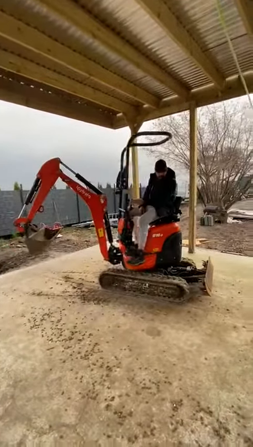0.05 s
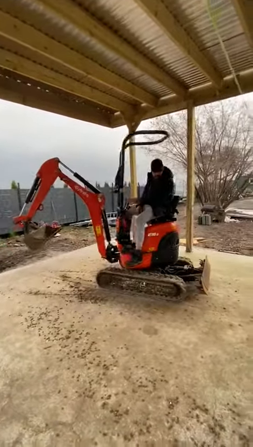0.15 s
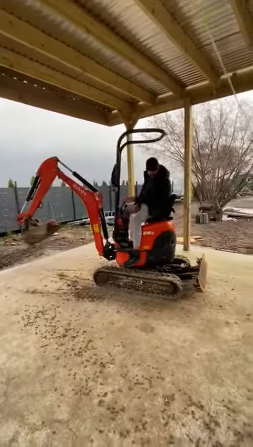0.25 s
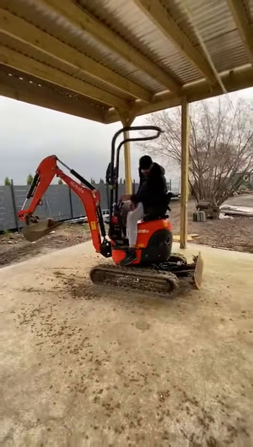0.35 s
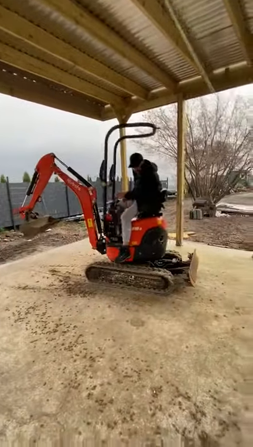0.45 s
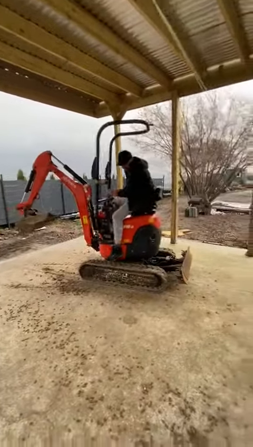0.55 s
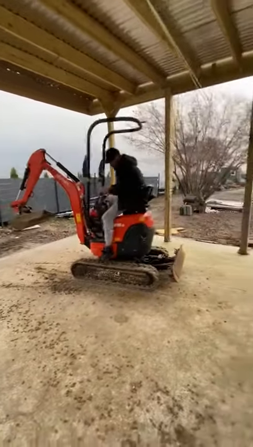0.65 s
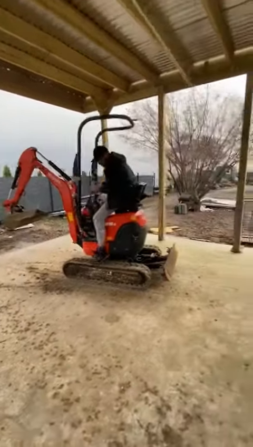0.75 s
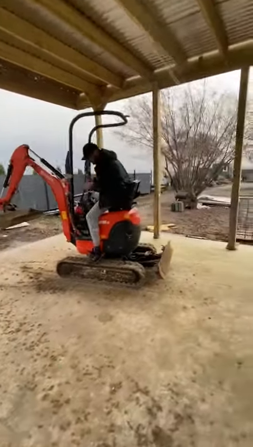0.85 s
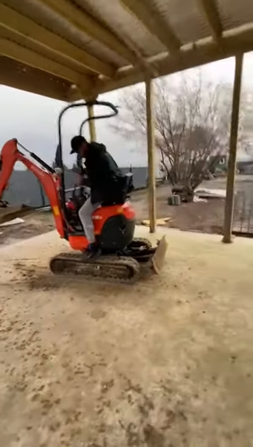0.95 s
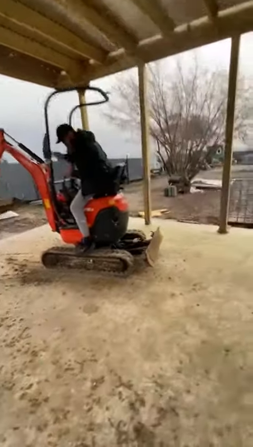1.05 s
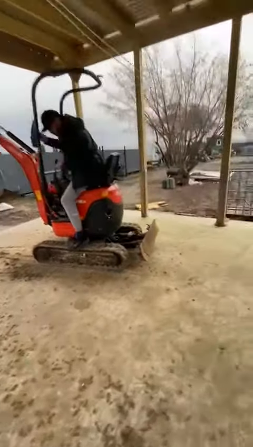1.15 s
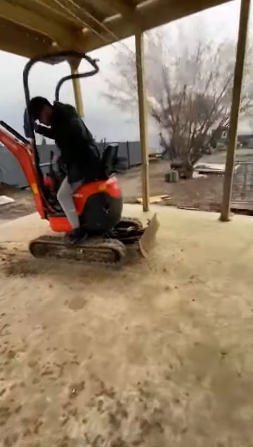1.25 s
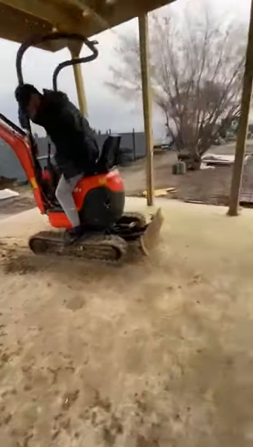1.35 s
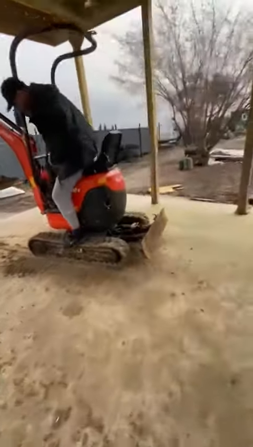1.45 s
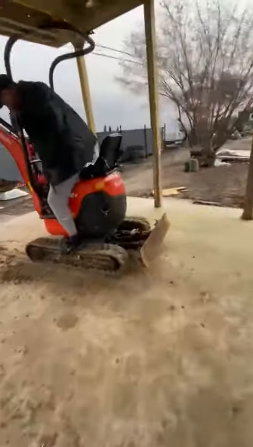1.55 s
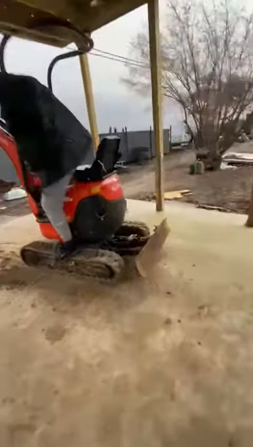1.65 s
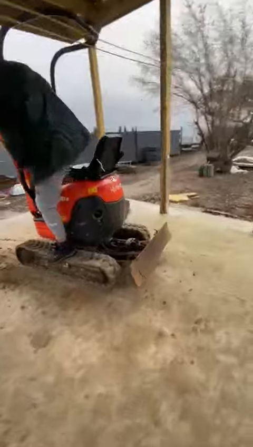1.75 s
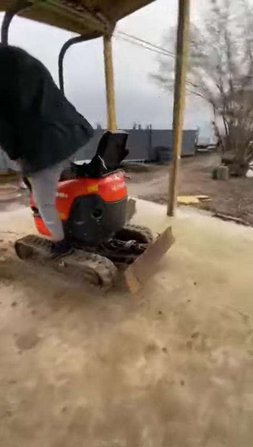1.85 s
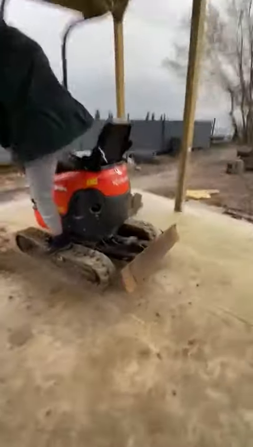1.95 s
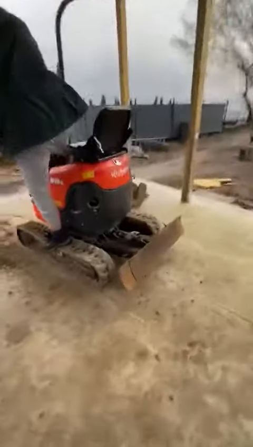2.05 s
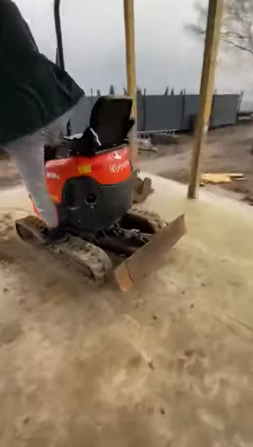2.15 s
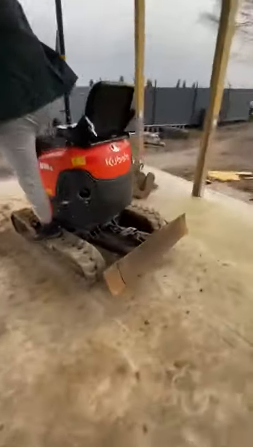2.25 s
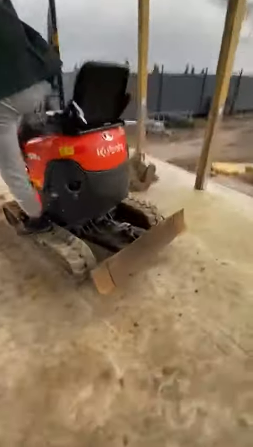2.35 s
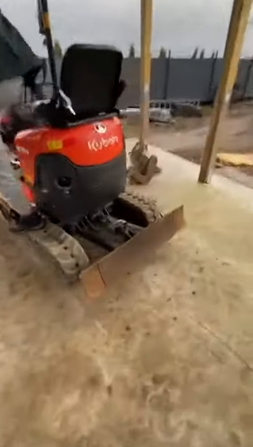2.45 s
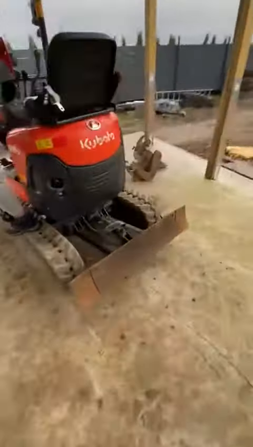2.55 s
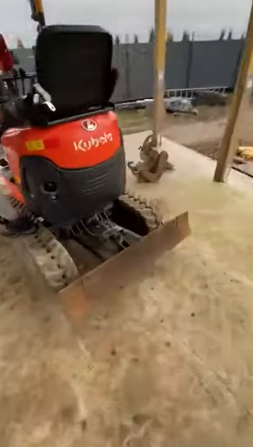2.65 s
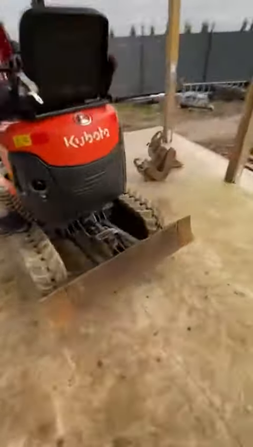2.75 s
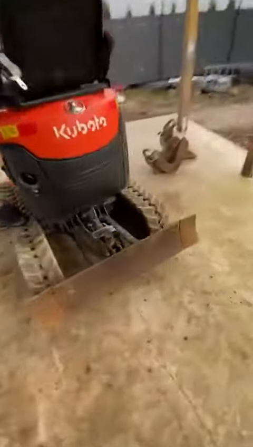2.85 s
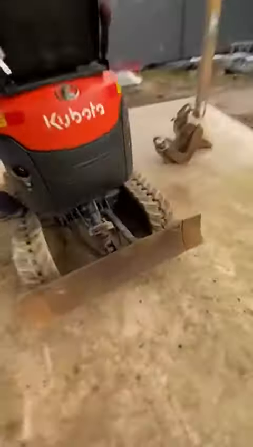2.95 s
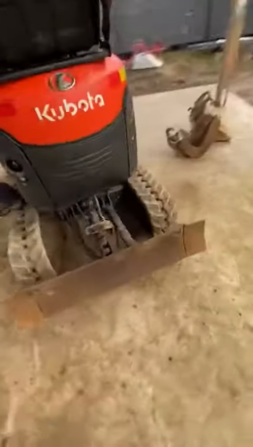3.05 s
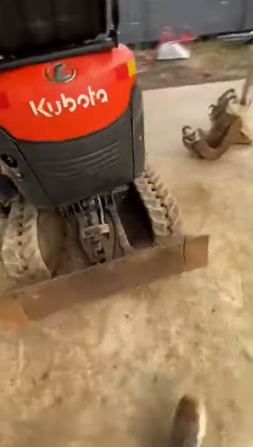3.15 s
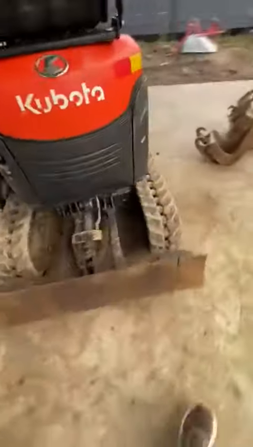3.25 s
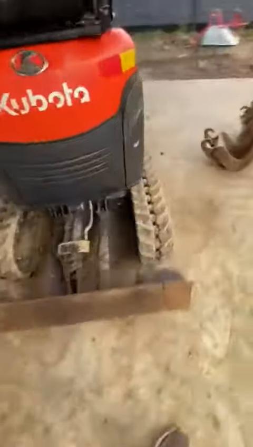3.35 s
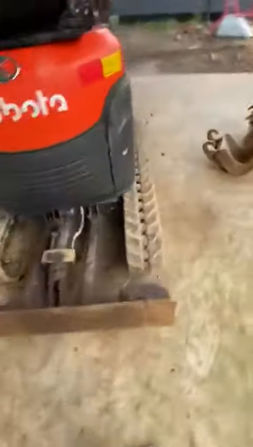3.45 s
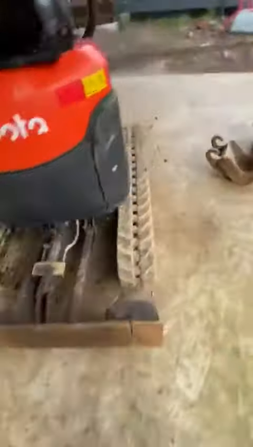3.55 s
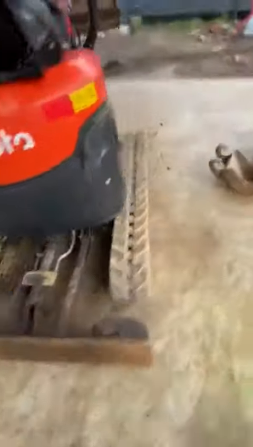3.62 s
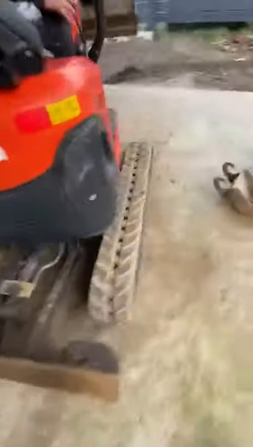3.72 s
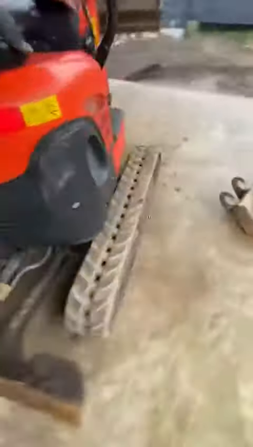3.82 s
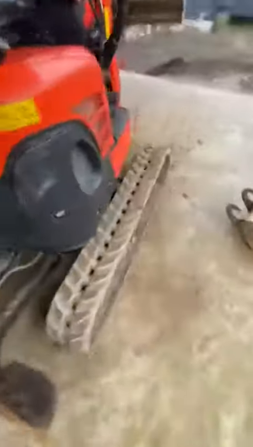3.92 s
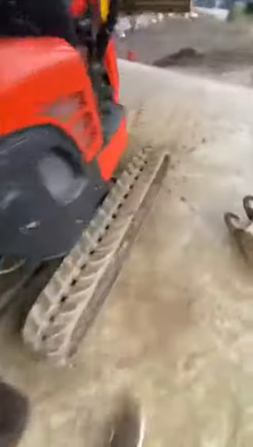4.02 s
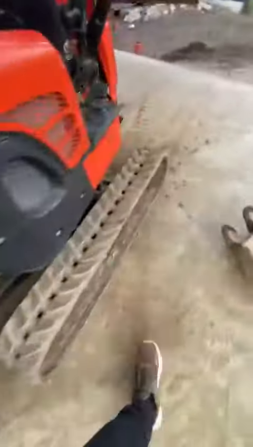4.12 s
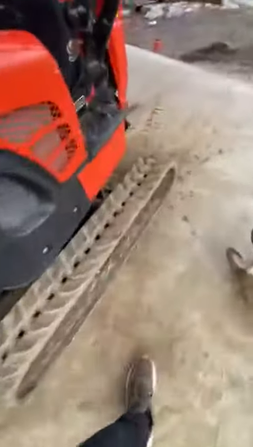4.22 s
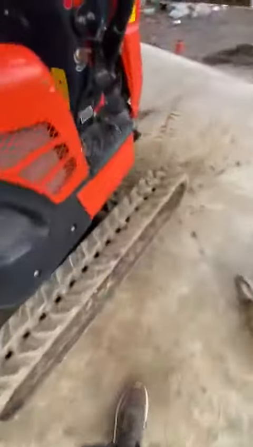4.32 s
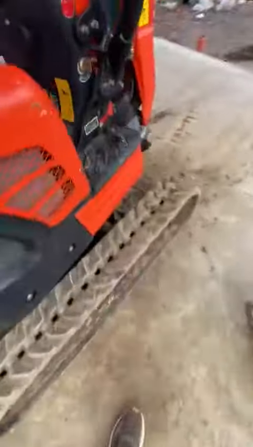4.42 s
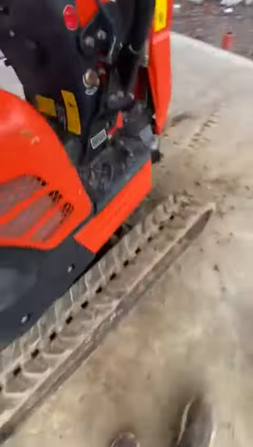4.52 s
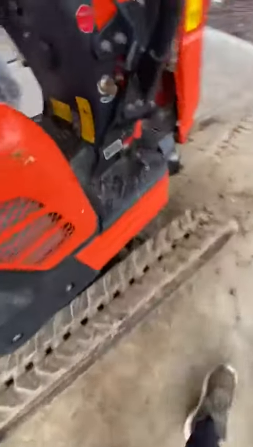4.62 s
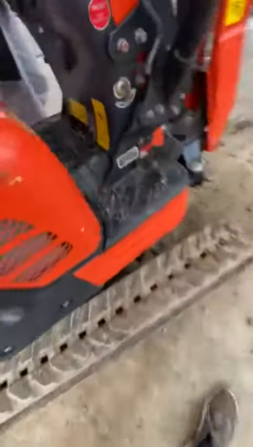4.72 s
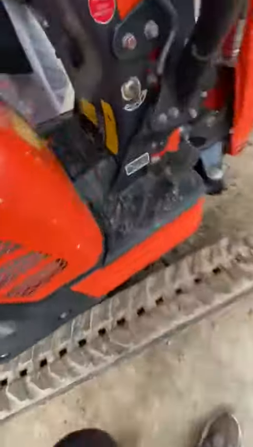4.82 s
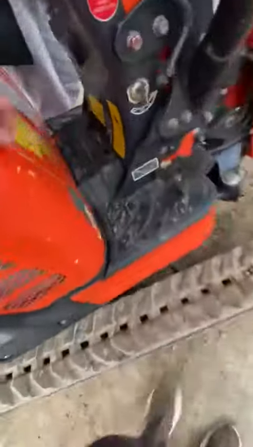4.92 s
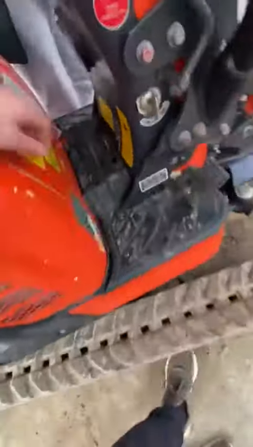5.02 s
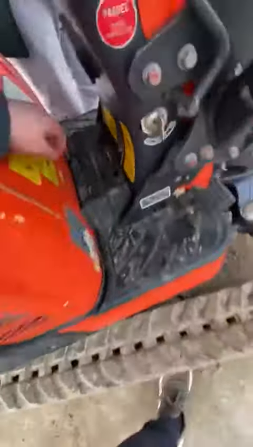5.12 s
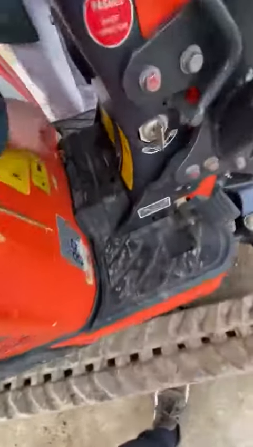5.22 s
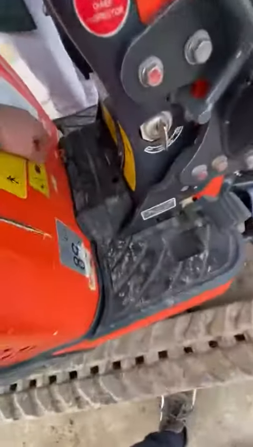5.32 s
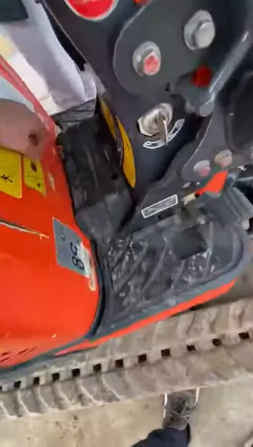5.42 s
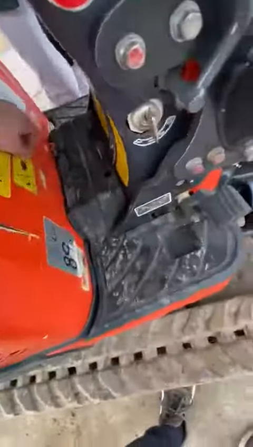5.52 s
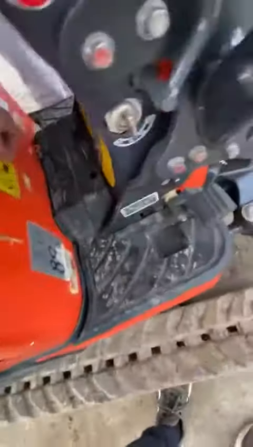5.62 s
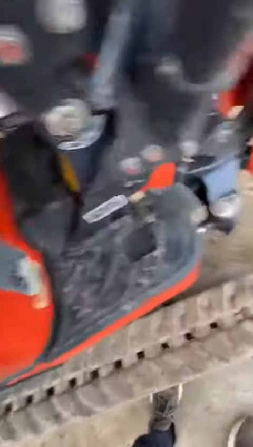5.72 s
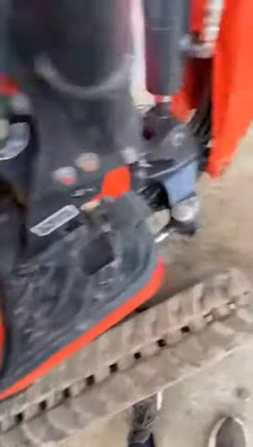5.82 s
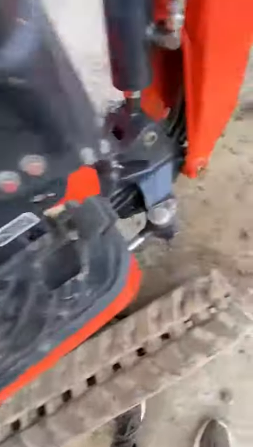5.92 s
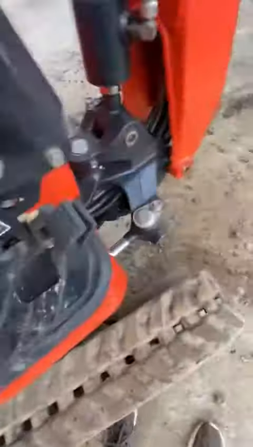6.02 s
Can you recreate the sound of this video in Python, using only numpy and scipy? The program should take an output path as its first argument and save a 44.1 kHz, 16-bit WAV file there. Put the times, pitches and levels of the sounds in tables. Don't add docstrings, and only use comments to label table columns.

```python
import sys
import numpy as np
from scipy import signal
from scipy.fft import rfft, irfft, next_fast_len
from scipy.io import wavfile
from scipy.ndimage import uniform_filter1d, map_coordinates

SR = 44100
rng = np.random.default_rng(int(sys.argv[2]) if len(sys.argv) > 2 else 0)


def pcm_store(signal):
    levels = np.round(np.clip(np.atleast_2d(signal), -1, 1) * 32767)
    wavfile.write(sys.argv[1], SR, levels.astype(np.int16).T)


def rack_gain(trim_db):
    fader = np.asarray(trim_db, float)
    return 10 ** (fader / 20)


N = 267819
GOVERNED_HZ = 53.4

# start_s, stop_s, change_hz [firings a second]
LOADS = [
    (-.1, .87, -.7),
    (3.22, 3.345, -2.5),
    (3.5, 3.98, -2.4),
    (4.27, 4.5, -2.5),
    (5.29, 6.2, 5),
]
# time_s, nearness_db, flank [share 0-1 round to the side],
# aim_db [in line with the pipe], path_m [pipe path minus intake path]
WALK = [(0, 0.5, 0.05, 1, 1.22), (.8, 2, 0.1, 3.5, 1.13), (1, 1.5, 0, 7, 1.76), (1.5, 3, 0, 8, 1.64),
        (2, 4.5, 0.01, 9, 1.53), (2.5, 6, 0.14, 9, 1.47), (2.9, 8, 0.02, 10, 1.39),
        (3.2, 8.5, 0.23, 9, 1.44), (3.4, 8.5, 1, 8.5, 1.53), (3.6, 7.5, 0.6, 7.5, 1.52),
        (3.8, 10, 0.7, 4, 2.3), (4, 9.5, 0.84, 6, 2.6), (4.2, 13, 1, 5, 2.6), (4.8, 12.5, 0.77, 2, 2.07),
        (5.15, 10, 1.1, 10, 2.41), (5.4, 11.5, 1, 4.5, 1.46), (5.63, 10, 0.71, 9, 2.23),
        (6.07, 9, 0.66, 15, 3.53)]


def unit(x):
    return x / np.sqrt(np.mean(x ** 2) + 1e-20)


def along(points, hz):
    f, v = np.transpose(points)
    return np.interp(np.log(hz + 1), np.log(f + 1), v, left=v[0], right=v[-1])


def curves(rows):
    s, *columns = np.transpose(rows)
    return [np.interp(np.arange(N) / SR, s, column) for column in columns]


def wobble(rate, size=N):
    knots = rng.standard_normal(int(size * rate / SR) + 4)
    return map_coordinates(knots, [np.arange(size) * rate / SR])


def span(start, stop, ramp):
    t = np.arange(N) / SR
    return (np.tanh((t - start) / ramp) - np.tanh((t - stop) / ramp)) / 2


def filtered(x, response):
    m = next_fast_len(N + SR // 2)
    return irfft(rfft(x, m) * response(np.fft.rfftfreq(m, 1 / SR)), m)[..., :N]


def rush(spectrum, gate, patchy_db, size=6):
    z = signal.stft(rng.standard_normal((2, N)), nperseg=512)[2]
    patches = uniform_filter1d(rng.standard_normal(z.shape[1:]), size=size, axis=0)
    patches = uniform_filter1d(patches, size=12, axis=1)
    pair = signal.istft(z * rack_gain(patchy_db * unit(patches)), nperseg=512)[1][:, :N]
    return unit(filtered(pair * gate, lambda hz: rack_gain(along(spectrum, hz))))


def bursts(turns, depth, shaft, scatter_db):
    count = (turns + .25).astype(int)
    size = rack_gain(scatter_db * rng.standard_normal(count[-1] + 1)[count])
    firing = (.5 + .5 * np.sin(2 * np.pi * turns)) ** 2
    return 1 + depth * size * firing + shaft * np.sin(2 * np.pi * turns * 2 / 3)


def speed():
    held = GOVERNED_HZ + .15 * wobble(3)
    held = held + sum(change * span(start, stop, .035) for start, stop, change in LOADS)
    after = np.arange(N) / SR - 5.6
    droop = 1 - .05 * np.clip(1 + after / .2, 0, 1)
    coast_to, coast_s = .47, .26
    return held * droop * (coast_to + (1 - coast_to) * np.exp(-np.maximum(after, 0) / coast_s))


def exhaust(turns, rate):
    # multiple, level_db,
    # near [dB per dB of nearness], aim [dB per dB of aim], power [of speed]
    strong_tones = [(2, -27, .01, 0.95, 4.7), (4, -33, 0.81, 0.21, 0.21), (5, -31, 0.46, 0.35, 4.2)]
    # multiple, level_db, near [dB per dB of nearness]
    weak_tones = [(3, -34.5, -0.096), (6, -33, -0.25), (7, -38, 0.29), (8, -39.5, 0.22), (9, -53.5, -0.078),
                  (11, -42.5, 0.1), (13, -48.5, 0.084)]
    near_db, flank, aim_db, path_m = curves(WALK)
    pace_db = 20 * np.log10(rate / GOVERNED_HZ)
    far_shape, flank_shape = .63, .3
    shape = far_shape + (flank_shape - far_shape) * np.clip(flank, 0, 1)
    intake = 0.98

    def tone(k, db, sway_db):
        level = rack_gain(db + 2.0 + sway_db * wobble(14))
        offset = .04 * k if k > 1 else -.3
        return level * np.cos(2 * np.pi * (k * turns + shape + offset + 0.078 * wobble(12)))

    def comb(k):
        delay_turns = k * rate * path_m / 343
        return np.abs(1 - intake * np.exp(2j * np.pi * delay_turns)) / (1 + intake)

    first_db = -38.5 + 2.255 * np.minimum(near_db, 11) - 0.31 * aim_db + 1.6 * pace_db
    out = tone(1, first_db, sway_db=0.9)
    for k, db, near, aim, power in strong_tones:
        out += comb(k) * tone(k, db + near * near_db + aim * aim_db + power * pace_db, sway_db=0.8)
    for k, db, near in weak_tones:
        out += tone(k, db - 2.5 + near * near_db + 10.3 * flank + 1.8 * pace_db, sway_db=2.5)
    return out


def casing(turns, rate):
    # level_db, near [dB per dB of nearness],
    # flank_db [change at the side], power [of speed]
    layers = [(-30.5, 0.29, 8, 2), (-34.5, 1.016, 0.74, 1.4), (-40.5, 1.177, 0.75, 1.37),
              (-44.5, 0.91, -2, 2.4)]
    # pitch_hz, density_db [per Hz]
    throb_spectrum = [(30, -7), (60, -5.5), (150, 8.5), (250, 5.5), (400, 5.5), (600, -18), (1000, -73)]
    block_spectrum = [(250, -58), (500, 2.5), (750, -1), (1000, -0.5), (1400, -6.5), (2100, -6.5),
                      (2700, -6.5), (4000, -50)]
    clatter_spectrum = [(1800, -48), (2800, -1), (3700, .5), (4700, 2.5), (5500, -4), (6400, -8),
                        (7500, -10), (9000, -72.5)]
    fan_spectrum = [(5500, -25), (6800, -2), (8300, -1), (9300, -5), (11000, -7), (11600, -13),
                    (12000, -40)]
    near_db, flank, *_ = curves(WALK)
    pace_db = 20 * np.log10(rate / GOVERNED_HZ)
    throb_db, block_db, clatter_db, fan_db = (
        db + near * near_db + flank_db * flank + power * pace_db for db, near, flank_db, power in layers)
    fan_db = fan_db + np.interp(np.arange(N) / SR, (3.77, 4.3, 6.9), (0, -6.5, -11))
    shake = wobble(14)

    gate = bursts(turns, depth=0.65, shaft=0.031, scatter_db=-2.0)
    throb = rack_gain(throb_db - 2.5 + 1.2 * wobble(5.5)) * rush(throb_spectrum, gate, patchy_db=-1.5)
    gate = bursts(turns, depth=.35, shaft=.05, scatter_db=4)
    block = rack_gain(block_db + .1 + .5 * shake) * rush(block_spectrum, gate, patchy_db=2, size=2)
    gate = bursts(turns, depth=.35, shaft=.07, scatter_db=4)
    clatter = rack_gain(clatter_db + .1 + .6 * shake) * rush(clatter_spectrum, gate, patchy_db=1.2, size=3)
    gate = bursts(turns, depth=.4, shaft=.1, scatter_db=4.5)
    fan = rack_gain(fan_db + .1 + .6 * shake) * rush(fan_spectrum, gate, patchy_db=1.5)
    return throb + block + clatter + fan


def hydraulics(turns, rate):
    pump_db = -41 + 10 * span(4.35, 5.28, .1)
    pump_db = pump_db + 4 * span(*LOADS[0][:2], .05) + 40 * np.log10(rate / GOVERNED_HZ)
    pump = rack_gain(pump_db + 2.5 * wobble(10)) * np.sin(2 * np.pi * 16 * turns + .35 * wobble(25))

    valve_db = -42 - 20 * (1 - span(3.85, 4.32, .1))
    valve = rack_gain(valve_db + 2.5 * wobble(12)) * np.sin(2 * np.pi * 41 * turns + .8 * wobble(40))

    def panel(hz):
        low = 0.06 / (1 + ((hz - 800) / 60) ** 2)
        middle = 1 / (1 + ((hz - 1070) / 25) ** 2)
        high = .5 / (1 + ((hz - 1420) / 30) ** 2)
        return low + middle + high

    panel_db = -30.5 + np.interp(np.arange(N) / SR, (3, 4.9), (-26, 0))
    shaking = rng.standard_normal(N) * bursts(turns, depth=1.3, shaft=.3, scatter_db=-9.5)
    return pump + valve + rack_gain(panel_db) * unit(filtered(shaking, panel))


def wind():
    # time_s, level_db, half_length_s, pitch_hz
    puffs_and_thuds = [(0.666, -29, 0.068, 66.4), (1.087, -39, .04, 60), (1.341, -22, .05, 64.6),
                       (1.556, -24, 0.053, 65.3), (1.78, -18, 0.05, 69), (2.385, -17.5, 0.092, 80.5),
                       (2.463, -18, 0.053, 84), (2.62, -27, 0.06, 90), (2.747, -28, 0.05, 80),
                       (3.48, -11, 0.016, 73.4), (3.741, -14.5, 0.019, 70), (4.5, -15, 0.037, 156),
                       (4.709, -17, 0.028, 93), (4.76, -19, 0.096, 158), (5.01, -18, 0.095, 158),
                       (6.01, -27, 0.07, 127), (4.82, -14, 0.02, 72)]
    n = SR // 2
    t, out = (np.arange(n) - n // 2) / SR, np.zeros((2, N + n))
    for s, db, half, hz in puffs_and_thuds:
        shared = 1.0 * wobble(26.4, size=n)
        separate = 0.48 * np.array([wobble(24.6, size=n), wobble(24.8, size=n)])
        swirl = np.sin(2 * np.pi * hz * t + shared + separate)
        out[:, round(s * SR):][:, :n] += rack_gain(db - 1.0) * np.exp(-(t / half) ** 2) * swirl
    spectrum = [(15, -34), (35, 6.5), (70, 3.5), (140, 5.5), (300, -31.5)]  # Hz, dB per Hz
    buffet = rush(spectrum, rack_gain(2 * wobble(11)), patchy_db=1)
    return out[:, n // 2:][:, :N] + rack_gain(-36) * (buffet[0] + buffet[1] * [[1], [-1]])


def clunks():
    # time_s, rattle_db, knock_db [above the rattle], knock_hz, rattle_hz [loudest pitch of each]
    strikes = [(1.9879, -32, 7, 710, 2600), (3.244, -23, 12, 820, 2600), (3.295, -24, -10, 400, 5000),
               (3.3536, -21, -10, 401, 5000), (3.4035, -13.5, 1, 393, 5300), (3.413, -27, 16, 430, 2640),
               (3.4646, -19, 4, 416, 5450), (3.5314, -29, 7, 432, 3600), (3.687, -21, 16, 526, 2400),
               (3.74, -22, -5, 434, 5000), (3.762, -18, -5, 434, 5900), (3.7706, -10.5, -4, 434, 4100),
               (4.0745, -24, 6, 940, 4800), (4.18, -30, 14, 900, 2600), (4.3898, -28, 16, 470, 2480),
               (4.464, -19, -4, 700, 4300), (4.497, -6, -3, 960, 1440), (4.5113, -22, 9, 1300, 3900),
               (4.5548, -14.5, 2, 870, 4300), (4.6085, -14.5, 2, 700, 5600), (5.8879, -32, 18, 780, 2300),
               (6.0185, -27, 14, 800, 3100), (6.022, -31, 13, 1290, 1600), (6.0409, -31, 14, 458, 3000)]
    # pitch_hz, level_db, t60_s [time to fade by 60 dB]
    frame = [(470, 8, 0.22), (800, -1, 0.017), (1050, -21, 0.061), (1300, -16, 0.058), (1590, -33, 0.026),
             (1840, -43, 0.017)]
    rattle, knock, t = np.zeros(N + SR), np.zeros(N + SR), np.arange(SR // 4) / SR
    rise = 1 - np.exp(-(t / .0035) ** 2)
    for s, db, knock_db, note_hz, tick_hz in strikes:
        start = round(s * SR)
        t60 = .036 + .0012 * max(knock_db, 0)
        burst = rise * rack_gain(-60 * (t / max(t60, .01)) ** 2)
        note = np.sin(2 * np.pi * tick_hz * t + 2 * wobble(107, size=len(t)))
        tick = rng.standard_normal(len(t)) + 0.36 * note
        rattle[start:][:len(t)] += rack_gain(db + 1) * burst * tick

        ring = rack_gain(-5 - 60 * t / 0.1) * np.sin(2 * np.pi * note_hz * t + .8 * wobble(60, size=len(t)))
        for hz, level, life in frame:
            fade = rack_gain(level - 13.5 + rng.normal(0, 3.1) - 60 * t / life)
            ring += fade * np.sin(2 * np.pi * hz * rng.normal(1, 0.032) * t)
        blow = rise * ring + 1.5 * burst * rng.standard_normal(len(t))
        knock[start:][:len(t)] += rack_gain(db + knock_db - 2.5) * blow

    def bright(hz):
        return (hz / 1500) ** 2 / (1 + (hz / 1500) ** 2) / (1 + (hz / 7400) ** 10)

    def dull(hz):
        return (hz > 300) / (1 + (hz / 2200) ** 4)
    return filtered(rattle[:N], bright) + filtered(knock[:N], dull)


def roof(x):
    # pitch_hz, t60_s [time to fade by 60 dB]
    fading = [(200, 0.15), (2000, 0.27), (10000, 0.54)]
    hz, t, z = signal.stft(rng.standard_normal(SR // 2), SR, nperseg=256)
    tail = signal.istft(z * rack_gain(-60 * t / along(fading, hz)[:, None]), SR, nperseg=256)[1]
    return signal.fftconvolve(x, tail / np.linalg.norm(tail))[:N]


def ports(direct, scattered, pair):
    # pitch_hz, apart [half turns], alike [0-1]
    bass = [(40, .12, .85), (210, .06, .9)]
    # pitch_hz, apart [half turns], alike [0-1]
    treble = [(9700, 2, .99)]
    # pitch_hz, difference_db
    tilt = [(60, 0), (110, 0), (350, 1), (620, 5.5), (1200, 7), (2200, 1.2), (6380, -.3), (11400, 2)]
    at, apart, alike = np.transpose(bass + pair + treble)
    sign = np.array([[1], [-1]])

    def response(hz):
        phase = np.pi * along(np.c_[at, apart], hz)
        cross = along(np.c_[at, alike], hz) * (np.cos(phase) + 1j * .4 * np.sin(phase))
        turn = np.arccos(np.abs(cross)) / 2
        port = rack_gain(sign * along(tilt, hz) / 2) * np.exp(.5j * sign * np.unwrap(np.angle(cross)))
        return np.array([port * np.cos(turn), sign * port * np.sin(turn)])
    return filtered(np.array([direct, scattered])[:, None], response).sum(axis=0)


def scene():
    # pitch_hz, apart [half turns between ports], alike [0-1]
    far = [(700, .55, 1), (1700, .35, .5), (2750, .86, .42), (3700, .3, .4), (4800, .33, .5),
           (5400, .04, .88), (5950, .06, .86), (7000, .96, .9), (8000, 1.03, .91), (9550, 1.95, .97)]
    near = [(680, .95, 1), (1850, .55, .6), (2450, 1, .99), (4550, .97, .97), (5350, .04, .93),
            (5850, .06, .92), (6400, .96, .88), (8400, 1.03, .84)]
    corner = [(700, .72, 1), (1750, .52, .6), (2150, .95, .95), (2700, 1.02, .95), (3150, .7, .7),
              (4300, .5, .4), (5400, .04, .95), (5950, .06, .95), (6500, .97, .96), (8500, 1.03, .95)]
    all_round = [(700, .7, 1), (1600, .55, .5), (2700, .6, .4), (3500, .95, .62), (4600, .9, .55),
                 (5600, .1, .6), (6800, .96, .9), (7700, 1.03, .92), (9000, 1.9, .96)]
    # time_s, far, near, corner, all_round [weights]
    arrivals = [(0, 1, 0, 0, 0), (1.8, 1, 0, 0, .1), (2.3, .1, .1, 0, .8), (3.15, 0, .15, 0, .85),
                (3.4, .1, 0, .55, .35), (3.65, .1, 0, .3, .6), (3.78, 0, 0, .95, .05),
                (4.05, 0, .2, .7, .1), (4.2, 0, 0, .1, .9), (4.62, 0, 0, .1, .9), (4.75, 0, .45, .5, .05),
                (4.93, 0, .7, .25, .05), (5, 0, 1.1, 0, 0), (5.14, 0, 1.1, 0, 0), (5.25, 0, .5, .35, .15),
                (5.5, .05, .4, .4, .15), (5.78, 0, .3, .5, .2), (6.07, .1, .1, .55, .25)]
    rate = speed()
    turns = np.cumsum(rate) / SR
    noise = casing(turns, rate)
    tones = exhaust(turns, rate) + hydraulics(turns, rate)
    hits = clunks()
    direct = noise[0] + tones + hits + rack_gain(-16.0) * roof(hits)
    scattered = noise[1] + rack_gain(-16) * roof(tones) + rack_gain(0.5) * roof(hits)

    weights = np.maximum([w + .12 * wobble(12) for w in curves(arrivals)], 1e-3)
    weights = weights / weights.sum(axis=0)
    pairs = (far, near, corner, all_round)
    engine = sum(w * ports(direct, scattered, pair) for w, pair in zip(weights, pairs))
    return engine + rack_gain([[-6], [-15]]) * hits + wind()


def top_cut(x):
    return signal.sosfilt(signal.butter(12, 11700, fs=SR, output="sos"), x)


def record(dry):
    limited = dry / (1 + np.abs(dry / .97) ** 8) ** (1 / 8)
    return top_cut(limited)


dry = scene()
out = record(dry)
pcm_store(out)
```